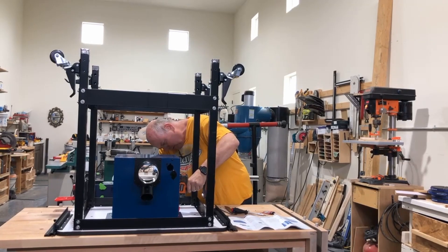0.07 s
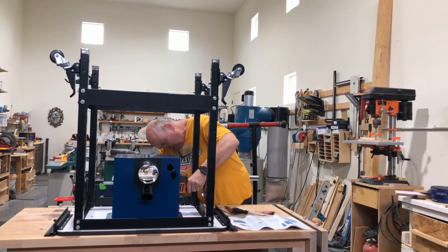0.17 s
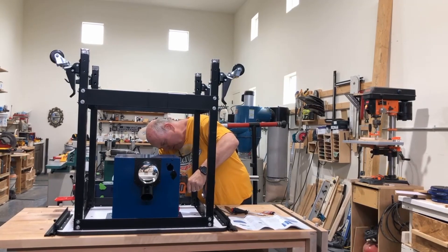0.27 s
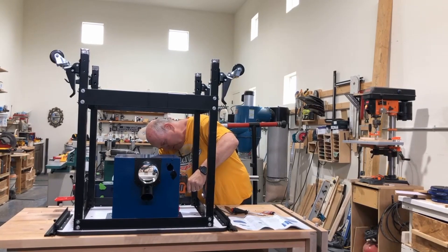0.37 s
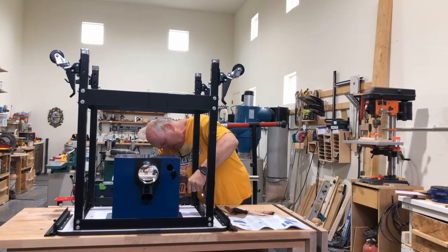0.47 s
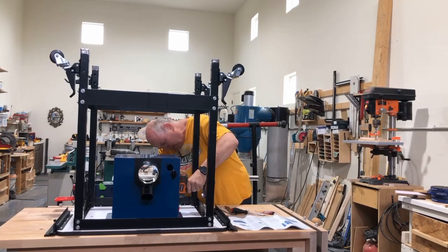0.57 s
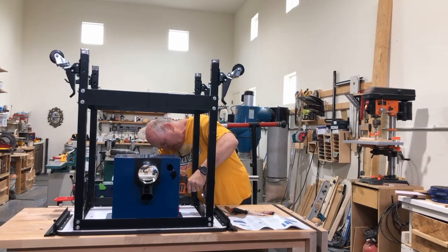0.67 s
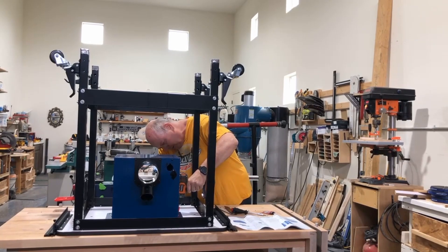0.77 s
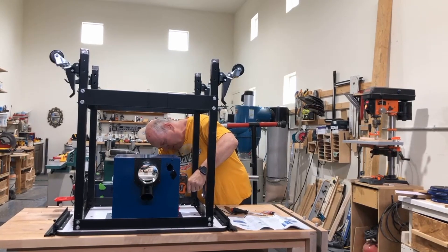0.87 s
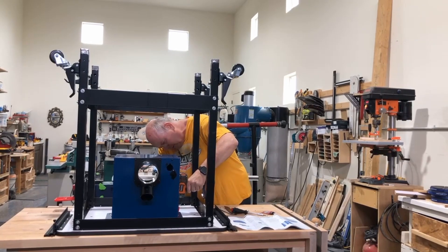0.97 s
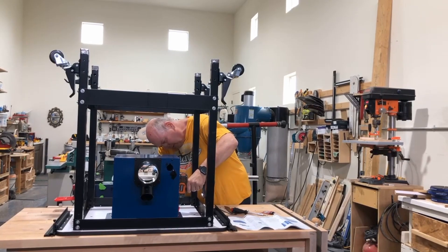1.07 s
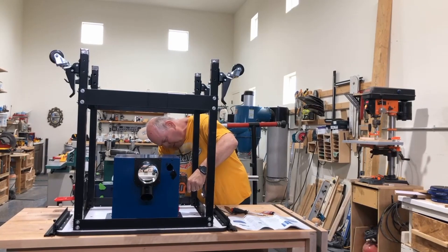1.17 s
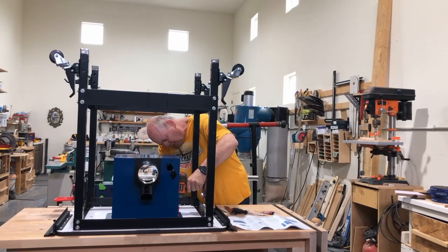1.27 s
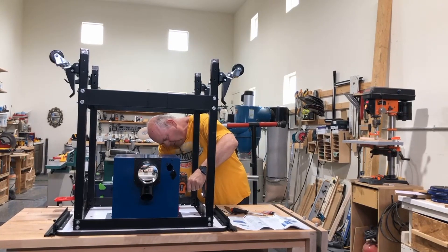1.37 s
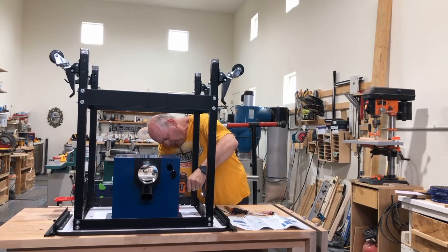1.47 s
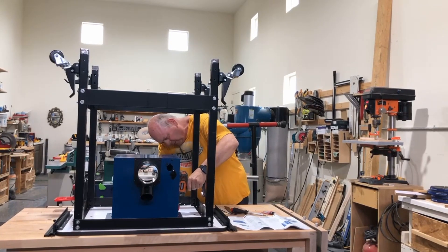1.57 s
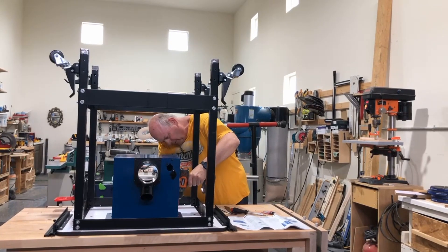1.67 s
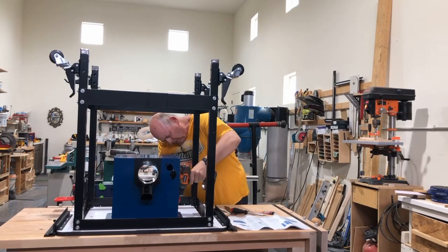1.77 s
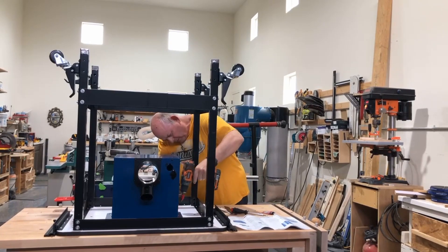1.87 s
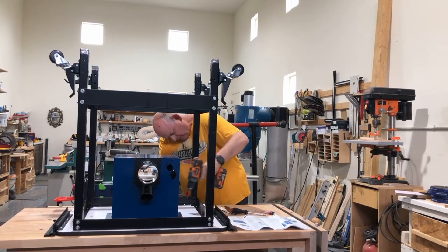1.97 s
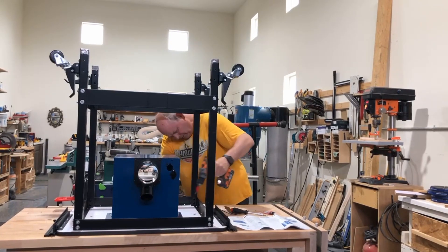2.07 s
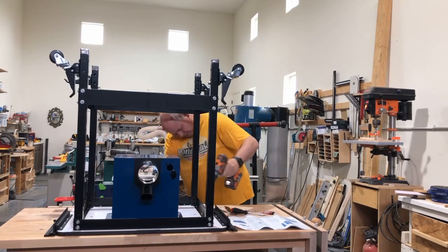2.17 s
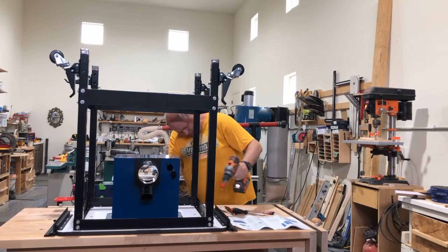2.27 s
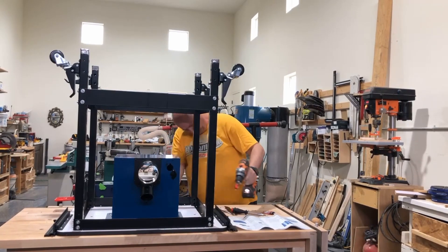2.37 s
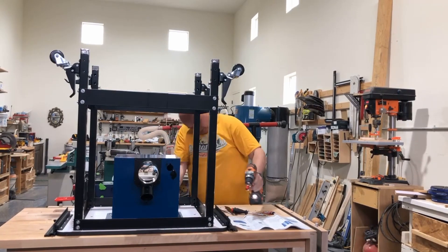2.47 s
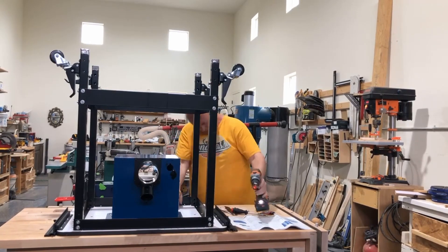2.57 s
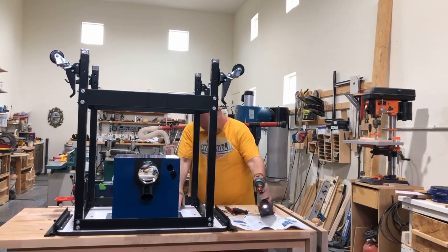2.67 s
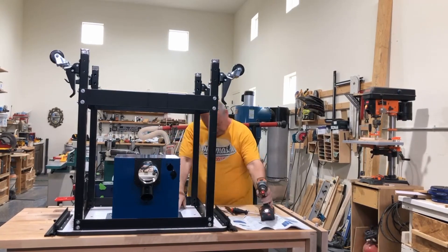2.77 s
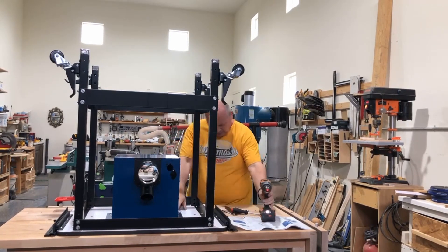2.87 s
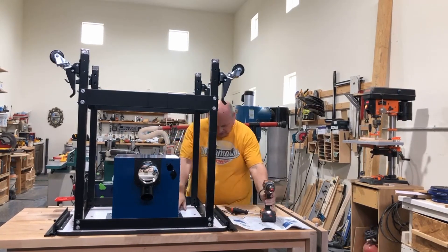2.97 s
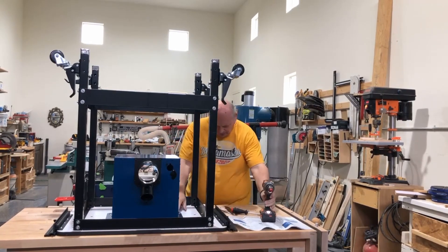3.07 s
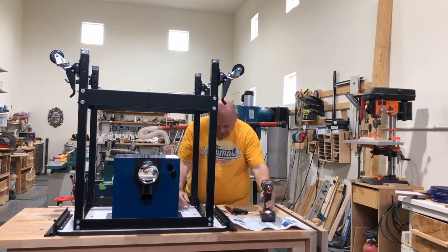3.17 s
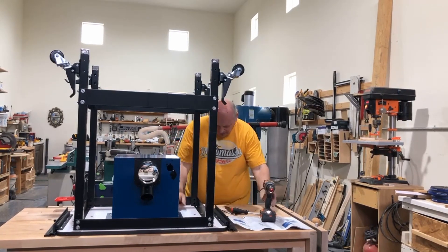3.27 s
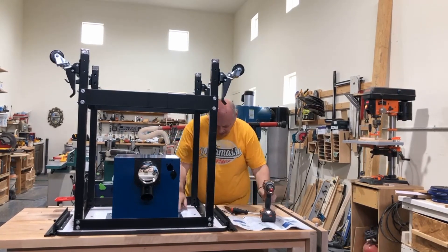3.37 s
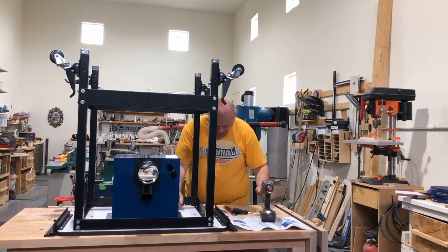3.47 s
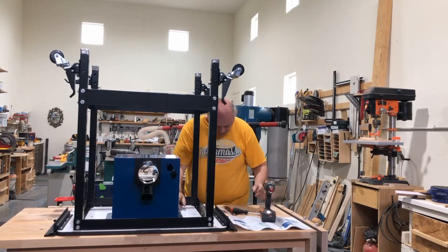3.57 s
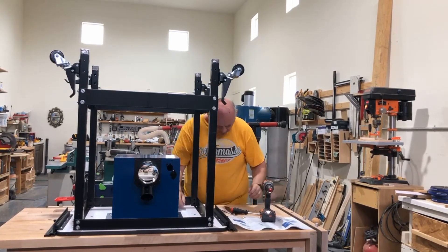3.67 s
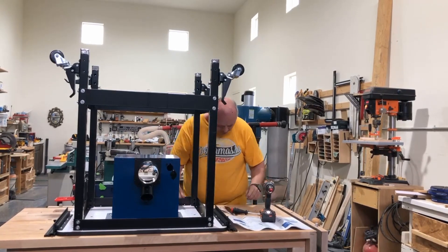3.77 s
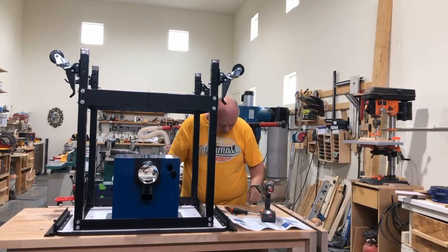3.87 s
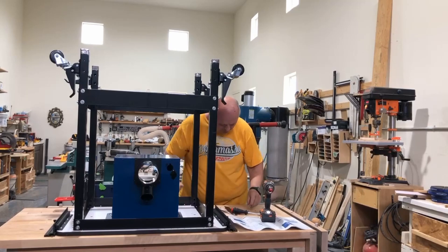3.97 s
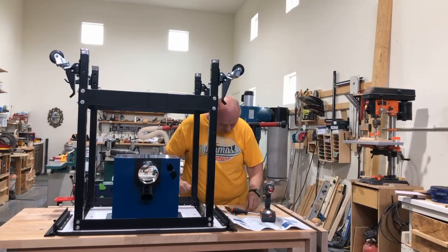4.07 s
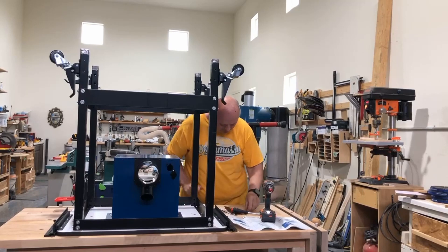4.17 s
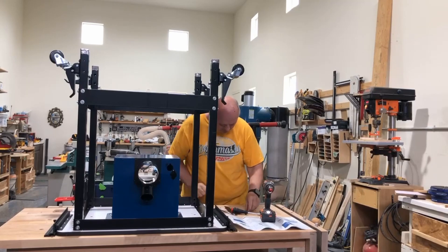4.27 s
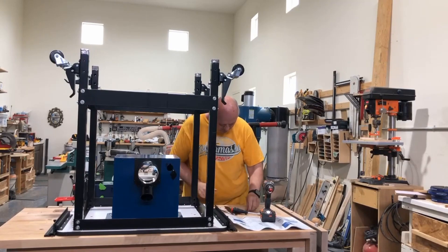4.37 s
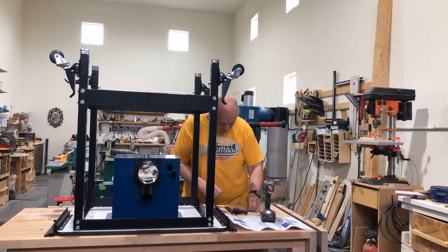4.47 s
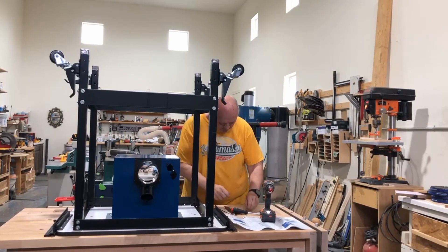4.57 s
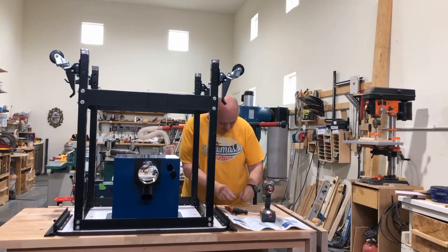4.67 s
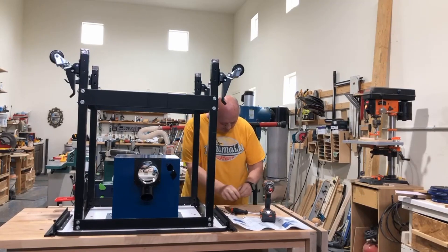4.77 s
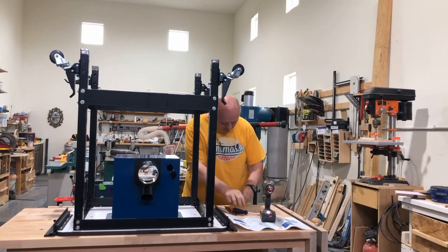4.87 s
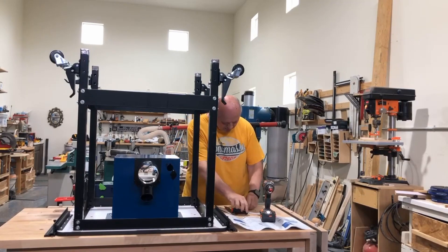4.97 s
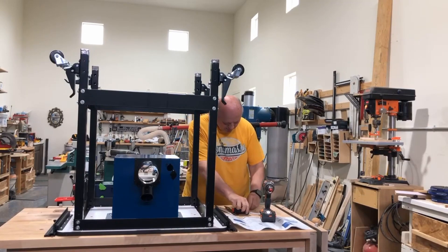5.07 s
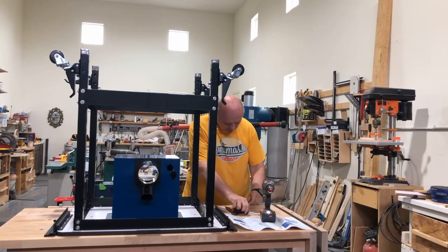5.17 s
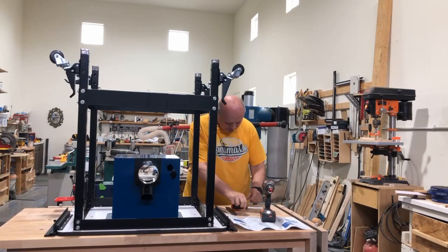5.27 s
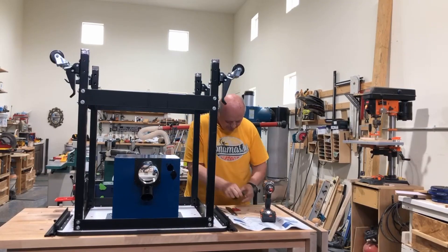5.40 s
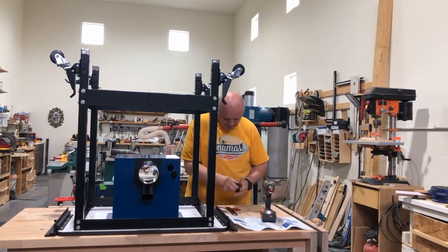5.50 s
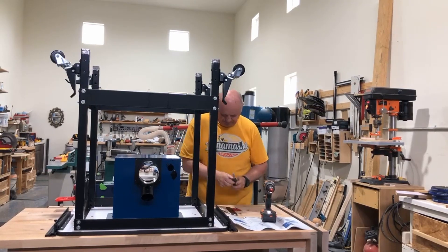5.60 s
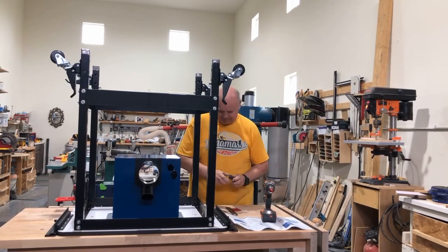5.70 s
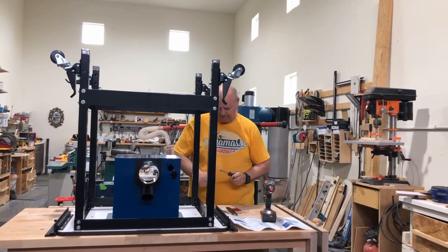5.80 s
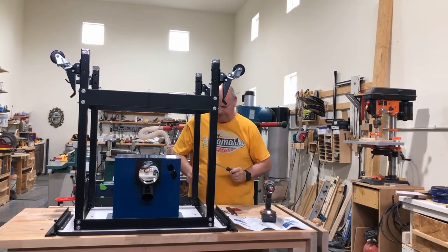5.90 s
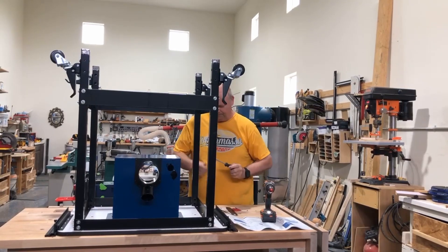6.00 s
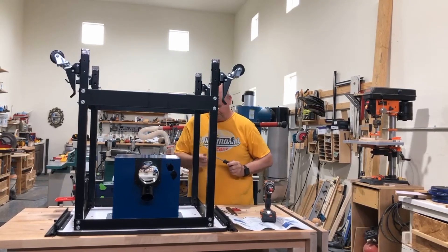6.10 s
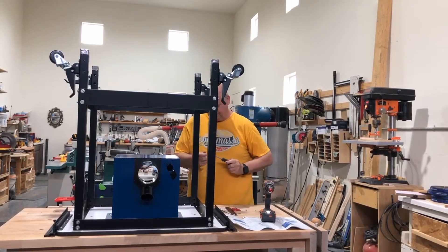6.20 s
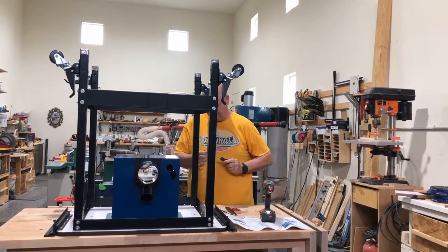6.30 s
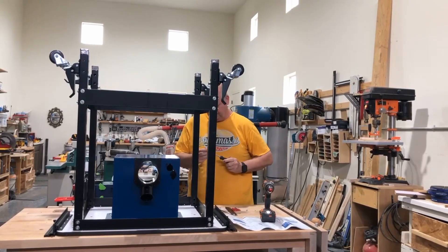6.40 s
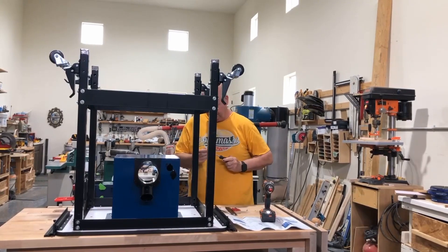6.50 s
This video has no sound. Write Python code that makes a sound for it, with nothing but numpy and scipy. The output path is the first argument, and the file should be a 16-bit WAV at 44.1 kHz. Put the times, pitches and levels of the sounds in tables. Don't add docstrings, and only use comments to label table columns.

```python
import sys
import numpy as np
from scipy import signal
from scipy.fft import rfft, irfft
from scipy.io import wavfile
from scipy.ndimage import uniform_filter1d

SR = 44100
rng = np.random.default_rng(int(sys.argv[2]) if len(sys.argv) > 2 else 0)


def volts(x):
    e = np.asarray(x, float) / 20
    return 10 ** e


def materialize(psi):
    bounded = np.clip(np.atleast_2d(psi).T, -1, 1)
    quanta = np.round(bounded * 32767).astype(np.int16)
    wavfile.write(sys.argv[1], SR, quanta)


N = 288414
RUN_IN = SR
TIME = np.arange(-RUN_IN, N) / SR
HZ = np.maximum(np.fft.rfftfreq(len(TIME), 1 / SR), 1)
WALLS = rng.standard_normal((17, RUN_IN))


def rms_one(x):
    return x / np.sqrt(np.mean(x ** 2) + 1e-20)


def in_time(rows):
    s, *columns = np.transpose(rows)
    return [np.interp(TIME, s, column) for column in columns]


def at_hz(points, hz):
    points_hz, values = np.transpose(points)
    return np.interp(np.log(hz), np.log(points_hz), values)


def coloured(x, spectrum):
    inside = (HZ > spectrum[0][0]) & (HZ < spectrum[-1][0])
    gain = volts(at_hz(spectrum, HZ)) * inside
    return rms_one(irfft(rfft(x) * gain, len(x)))


def drift(rate_hz):
    r = np.exp(-2 * np.pi * rate_hz / SR)
    return rms_one(signal.lfilter([1], [1, -2 * r, r * r], rng.standard_normal(len(TIME))))


def sine(turn):
    return np.sqrt(2) * np.sin(turn)


def narrow_noise(hz, width_hz):
    r = np.exp(-np.pi * width_hz / SR)
    poles = [1, -2 * r * np.cos(2 * np.pi * hz / SR), r * r]
    once = signal.lfilter([1e-3], poles, rng.standard_normal(len(TIME)))
    return rms_one(signal.lfilter([1, 0, -1], poles, once))


def grains(per_s, spread_db):
    sizes = volts(spread_db * np.minimum(rng.exponential(1, len(TIME)), 4))
    happens = rng.random(len(TIME)) < per_s / SR
    return rng.standard_normal(len(TIME)) * (.3 + sizes * happens)


def swells(rows, rise_s):
    power = np.zeros(len(TIME))
    for start_s, level_db, t60_s in rows:
        age = np.maximum(TIME - start_s, 0)
        power += (volts(level_db - 60 * age / t60_s) * np.minimum(age / rise_s, 1)) ** 2
    return np.sqrt(power)


def shortest_pulse(colour):
    cepstrum = irfft(np.log(volts(at_hz(colour, np.fft.rfftfreq(2048, 1 / SR) + 1))))
    folded = np.r_[cepstrum[0], 2 * cepstrum[1:1024], np.zeros(1024)]
    pulse = irfft(np.exp(rfft(folded)))
    return pulse / np.abs(pulse).max()


def struck(events, modes, colour, ring_db):
    clicks = np.zeros(len(TIME)) + 1e-18
    clicks[[RUN_IN + round(s * SR) for s, db in events]] = volts(np.array(events)[:, 1])
    blow = shortest_pulse(colour)
    for gap_s in (.0003, .0007, .0013):
        silence = np.zeros(round(gap_s * SR))
        blow = signal.lfilter(np.r_[-.55, silence, 1], np.r_[1, silence, -.55], blow)
    crack = signal.fftconvolve(clicks, blow)[:len(TIME)]
    contact_hz = 3500
    push = signal.sosfilt(signal.butter(2, contact_hz, fs=SR, output="sos"), clicks)
    ring = np.zeros(len(TIME))
    for hz, level_db, t60_s in modes:
        r, w = volts(-60 / (t60_s * SR)), 2 * np.pi * hz / SR
        strength = volts(level_db + ring_db) * np.sin(w)
        ring += signal.lfilter([0, strength], [1, -2 * r * np.cos(w), r * r], push)
    return crack, ring


def workshop(x, wet_db, spot=0):
    # pitch_hz, t60_s
    room = [(125, 1.1), (200, 0.88), (300, 1.2), (1000, 1.12), (2800, 1.24), (7000, 0.47), (10000, 0.43),
            (14000, 0.25)]
    age, tail = np.arange(RUN_IN) / SR, np.zeros(RUN_IN)
    edges = 45 * 2 ** np.arange(0, 8.6, .5)
    for low, high, white in zip(edges, edges[1:], np.roll(WALLS, spot, axis=0)):
        t60_s = at_hz(room, np.sqrt(low * high))
        band = signal.sosfilt(signal.butter(2, [low, high], "band", fs=SR, output="sos"), white)
        tail += band * volts(-60 * age / t60_s) / np.sqrt(t60_s * SR / 13.8)
    tail *= np.clip(age / 0.0044 - .3, 0, 1)
    wet = signal.fftconvolve(x, tail)[:len(x)]
    return (x + volts(wet_db) * wet) / np.sqrt(1 + volts(2 * wet_db))


def moving(x, wet_db):
    spots = [-.2, .45, 1.0, 1.5, 1.72]
    nearness = [np.interp(TIME, spots, row) for row in np.eye(len(spots))]
    return sum(workshop(x * np.sqrt(near), wet_db, spot) for spot, near in enumerate(nearness))


def drill():
    # time_s, speed_hz
    rotor = [
        (0, 303.5),
        (.3, 303.7),
        (.5, 302.5),
        (.7, 302.0),
        (1.28, 302.5),
        (1.48, 305.6),
        (1.6, 305.8),
        (1.75, 308.5),
        (1.9, 308.0),
    ]
    # time_s, level_db
    unbalance = [
        (0, -37),
        (.04, -22.5),
        (.12, -32),
        (.21, -27.5),
        (.54, -33),
        (.76, -28),
        (1.19, -28),
        (1.63, -39.5),
        (1.8, -34),
    ]
    orders = [2, 3, 4, 8, 10, 13, 15, 20, 25, 29, 30, 31, 40, 41]
    # loaded_db, free_db
    order_db = [(-44, -40), (-43, -52), (-52, -40), (-34, -30), (-32.5, -30), (-42, -42), (-31, -31),
                (-32, -34), (-40, -46), (-43, -34), (-35, -33), (-54, -37), (-44, -43), (-54, -44)]
    # pitch_hz, level_db (per Hz)
    gear_colour = [(880, -10.5), (1500, -7), (2240, -3.5), (2500, -2.5), (2880, -1.5), (3130, -2),
                   (3220, 0), (4700, -3.5), (4830, -5), (6170, -1), (8000, -14.5), (10400, -47),
                   (17600, -120)]
    # pitch_hz, level_db (per Hz)
    bit_colour = [(210, 4.5), (350, -3), (424, -7), (547, -3.5), (599, -1), (836, -3.5), (916, -10.5),
                  (1900, -12.5), (2470, -59), (4180, -120)]
    # pitch_hz, level_db (per Hz)
    air_colour = [(4120, -17), (7000, -5.5), (7580, -3), (8410, -3), (9080, -2), (9610, -3), (11700, -3.5),
                  (14600, -10.5), (15500, -14.5)]

    speed, = in_time(rotor)
    free = np.clip((speed - 302.5) / (308.5 - 302.5), 0, 1)
    turn = 2 * np.pi * np.cumsum(speed * (1 + 0.001 * drift(25))) / SR
    sag_db = 1.0 * np.maximum(TIME, 0)

    def by_load(loaded_db, free_db):
        return loaded_db + free * (free_db - loaded_db)

    tones = np.zeros(len(TIME))
    for order, (loaded_db, free_db) in zip(orders, order_db):
        level_db = by_load(loaded_db, free_db) + 2.65 * drift(12)
        tones += volts(level_db) * sine(order * turn + order ** 2)

    once_a_turn = 1 + 0.2 * np.cos(turn) + 0.45 * np.cos(turn / 3.5)
    gears = coloured(grains(6000, 2.5) * once_a_turn, gear_colour)
    gears *= volts(by_load(-16.5, -18.5) - sag_db + 0.89 * drift(39.6))
    bit = coloured(grains(1500, 2.5), bit_colour)
    bit *= volts(by_load(-31.5, -34.5) - sag_db + 1.8 * drift(7.0))
    rumble = signal.sosfiltfilt(signal.butter(2, 330, fs=SR, output="sos"), bit)
    bit = bit - np.sqrt(free) * rumble
    air = coloured(grains(9000, 3.5) * once_a_turn, air_colour)
    air *= volts(by_load(-19.5, -20) - sag_db + 1.8 * drift(30))

    brake_s, brake_fade_s, shake_t60_s = 1.84, 0.0028, 0.83
    running = np.clip((brake_s - TIME) / brake_fade_s, 0, 1)
    ring_out_db = 60 * np.maximum(TIME - brake_s, 0) / shake_t60_s
    shake = volts(in_time(unbalance)[0] - ring_out_db + 1.7 * drift(36)) * sine(turn)
    return running * tones, running * (gears + bit + air), shake


def set_down():
    # start_s, level_db (peak)
    landings = [
        (2.821, -18),
        (2.8335, -2),
        (2.845, -14),
        (2.855, -12),
        (2.871, -10),
        (3.314, -48),
    ]
    # pitch_hz, level_db, t60_s
    bench = [(252, -26, 0.11), (684, -6, 0.064), (975, -17, 0.013), (1460, -1, 0.013)]
    # pitch_hz, level_db (per Hz)
    thud_colour = [(150, -8), (300, -3), (700, 0), (1200, -2), (2500, -7), (4500, -11), (8000, -22),
                   (15500, -46)]
    thud, ring = struck(landings, bench, thud_colour, ring_db=-18.5)
    return workshop(thud, wet_db=8, spot=1) + ring


def bench_boom():
    # start_s, pitch_hz, level_db, rise_s, t60_s
    swing = (2.855, 82, -29, .025, 1.2)
    start_s, hz, level_db, rise_s, t60_s = swing
    age = np.maximum(TIME - start_s, 0)
    return volts(level_db - 60 * age / t60_s) * (1 - np.exp(-age / rise_s)) * np.sin(2 * np.pi * hz * age)


def pick_up():
    # start_s, level_db (peak)
    contacts = [
        (5.039, -40),
        (5.0505, -24),
        (5.054, -18),
        (5.059, -28),
        (5.068, -30),
    ]
    # pitch_hz, level_db, t60_s
    part = [(988, -5, 0.22), (2250, 9.5, 0.013), (2685, 11.5, 0.045)]
    # pitch_hz, level_db (per Hz)
    clack_colour = [(250, -8), (450, 10.5), (700, 7), (1150, 11.5), (1800, 6.5), (2600, 9), (4000, 4),
                    (6500, -4), (14000, -22.5)]
    clack, ring = struck(contacts, part, clack_colour, ring_db=-16)
    return volts(7.0) * workshop(clack, wet_db=5.5, spot=3) + workshop(ring, wet_db=-9, spot=3)


def stand():
    # start_s, level_db, t60_s
    nudges = [(.03, -25, 0.17), (.13, -39, 1.0), (.26, -35.5, 3.3), (.55, -33, 1.7), (.79, -29, 0.13),
              (.89, -31, 0.76), (1.14, -31.5, 0.24), (1.3, -24.5, 0.14), (1.41, -32.5, 0.39),
              (1.68, -42, 0.41), (2.12, -37, 1.07), (2.85, -42, 1.42), (3.17, -42.5, 0.98),
              (3.4, -46.5, 2.7), (3.54, -40, 1.23), (3.7, -52, 0.43)]
    # start_s, level_db, t60_s
    shuffles = [
        (2.13, -39.5, 1.05),
        (2.825, -38.5, 3.6),
        (2.98, -40, 0.93),
        (3.25, -48, 4),
        (3.55, -47, 1.6),
        (3.95, -54, .8),
        (4.03, -59, 0.46),
        (4.465, -56, .25),
    ]
    # pitch_hz, width_hz, level_db
    modes = [(255, 70, 3), (294, 49, 2), (427, 300, 0), (527, 240, -3.5), (663, 150, -3.5), (1120, 2600, 0)]
    lowest_hz = 187 + 5 * drift(30)
    hum = swells(nudges, rise_s=0.024) * sine(2 * np.pi * np.cumsum(lowest_hz) / SR)
    body = rms_one(sum(volts(db) * narrow_noise(hz, width_hz) for hz, width_hz, db in modes))
    return hum + swells(shuffles, rise_s=0.017) * body


def rustle():
    # start_s, level_db, t60_s
    stirs = [(2.475, -47, .1), (2.54, -61, 2.5), (2.835, -34, 0.27), (2.93, -43.5, 0.59), (3.02, -54, 1.0),
             (3.11, -50.5, 0.82), (3.33, -52.5, 0.54), (3.43, -54, 1.1), (3.48, -55, .5), (3.61, -55.5, .6),
             (3.66, -61, 0.35), (3.84, -60, 1.5), (3.94, -47.5, 0.73), (4.02, -60, 0.56)]
    # pitch_hz, level_db (per Hz)
    paper = [(900, -2), (2000, 0), (3500, -3), (5500, -1), (7500, -7), (10500, -3), (12500, -9),
             (15300, -18)]
    return swells(stirs, rise_s=0.015) * coloured(grains(2500, 1.8), paper)


def background():
    # pitch_hz, level_db (per Hz)
    fan_colour = [(53, -52), (90, -11), (124, -2.5), (208, -13.5), (236, -12), (347, -11.5), (403, -15),
                  (440, -13.5), (1010, -20.5), (2010, -21), (2340, -24), (5880, -28.5), (15100, -38)]
    # pitch_hz, width_hz, level_db (rms)
    bands = [(32.2, 5.92, -70), (63.4, 92, -51.5), (120.1, 4.1, -57.5), (238.2, 4.7, -68), (2010, 110, -66),
             (5800, 600, -78)]
    # pitch_hz, level_db (rms), waver_db
    mains_tone = (59.6, -48.5, 1.4)
    fan = coloured(rng.standard_normal(len(TIME)), fan_colour)
    above = signal.sosfilt(signal.butter(4, 100, "high", fs=SR, output="sos"), fan)
    fan = volts(-53.5) * fan / np.std(above)
    mains_hz, level_db, waver_db = mains_tone
    mains = volts(level_db + waver_db * drift(8.2)) * sine(2 * np.pi * mains_hz * TIME)
    return fan + mains + sum(volts(db) * narrow_noise(hz, width_hz) for hz, width_hz, db in bands)


def scene():
    tones, noise, shake = drill()
    tool = moving(tones, wet_db=0.5) + moving(noise, wet_db=11) + shake
    handling = set_down() + bench_boom() + pick_up()
    mono = tool + handling + stand() + rustle() + background()
    return np.tile(mono[RUN_IN:], (2, 1))


def thin_out(x):
    # middle_s, length_s, share of lines dropped (0-1), evenness over pitch (0-1)
    thinned = [(.052, .022, .65, .4), (.113, .022, .6, .4), (.157, .022, .6, .4), (.458, .028, .7, .5),
               (.528, .022, .65, .5), (.617, .038, .86, .3), (.764, .062, .9, .15), (.9, .037, .86, .35),
               (1.132, .022, .7, .6), (1.368, .022, .65, .5), (1.437, .024, .65, .5),
               (1.895, .022, .65, .6), (2.015, .022, .6, .5), (2.128, .02, .65, .5), (2.515, .028, .65, .6),
               (3.013, .026, .6, .5), (3.187, .036, .86, .6), (3.782, .024, .75, .7), (4.05, .022, .62, .5),
               (5.395, .026, .7, .6)]
    out = x.copy()
    for s, length_s, share, even in thinned:
        size = round(1.5 * length_s * SR)
        start = round(s * SR) - size // 2
        frame = slice(start, start + size)
        lines = rfft(out[0, frame] * signal.windows.tukey(size, .7))
        nearby = uniform_filter1d(np.abs(lines), size=30)
        weight = np.abs(lines) / (nearby + 1e-9) ** even
        weak = weight < np.quantile(weight[:size // 3], np.clip(share, 0, 1))
        out[:, frame] -= irfft(lines * weak, size)
    return out


def spread_bands(x):
    # time_s, low_hz, high_hz
    spread = [(.08, 8200, 9800), (.22, 6900, 8400), (.22, 12400, 13900), (.41, 5100, 7000),
              (.94, 4200, 5300), (.94, 6200, 7700), (.99, 12400, 14600), (1.055, 7500, 9100),
              (1.055, 13000, 14600), (3.24, 4200, 9700), (4.09, 4700, 7600), (4.38, 4300, 10300),
              (5.45, 4600, 9700), (5.61, 5700, 9000)]
    size, side_db = 2048, -4
    out, hz = x.copy(), np.fft.rfftfreq(size, 1 / SR)
    for s, low_hz, high_hz in spread:
        frame = slice(round(s * SR) - size // 2, round(s * SR) + size // 2)
        band = (hz > low_hz) & (hz < high_hz)
        level = np.std(irfft(rfft(x[0, frame]) * band))
        side = rms_one(irfft(rfft(rng.standard_normal(size)) * band)) * np.hanning(size) ** .5
        out[:, frame] += volts(side_db) * level * side * [[1], [-1]]
    return out


def low_pass(x):
    return signal.sosfilt(signal.butter(12, 15680, fs=SR, output="sos"), x)


def record(dry):
    rounded = 0.95 * np.tanh(dry / 0.95)
    mix = spread_bands(thin_out(rounded))
    return low_pass(mix)


dry = scene()
out = record(dry)
materialize(out)
```